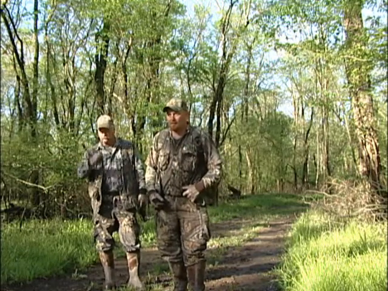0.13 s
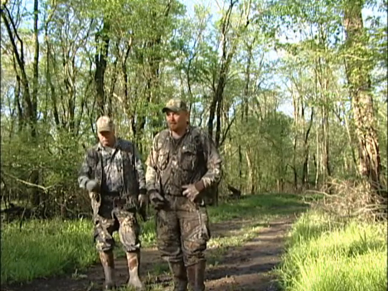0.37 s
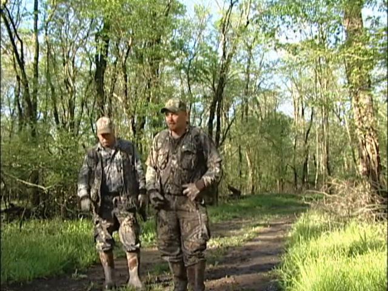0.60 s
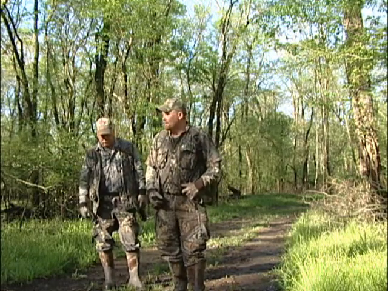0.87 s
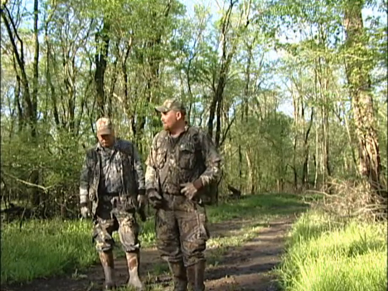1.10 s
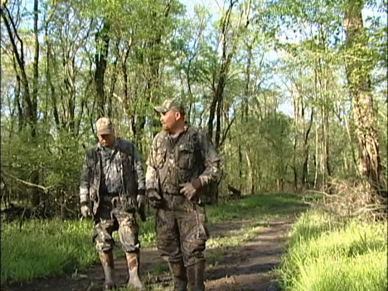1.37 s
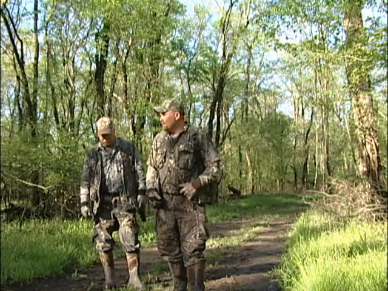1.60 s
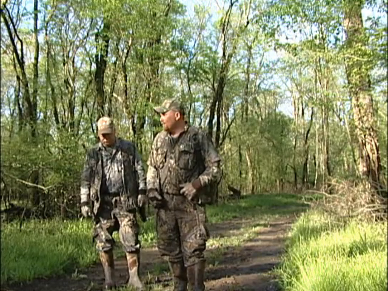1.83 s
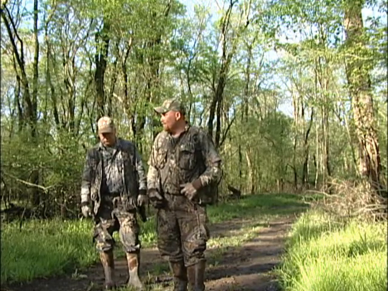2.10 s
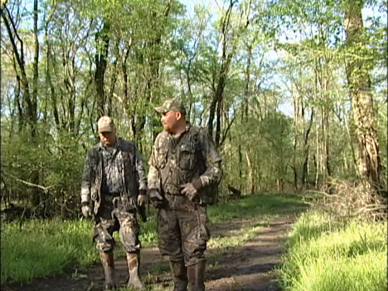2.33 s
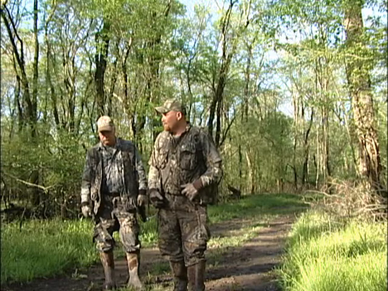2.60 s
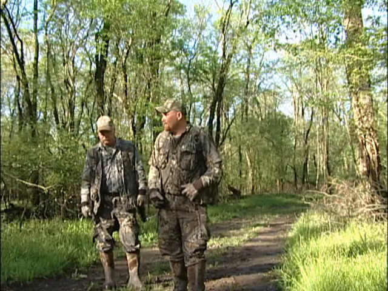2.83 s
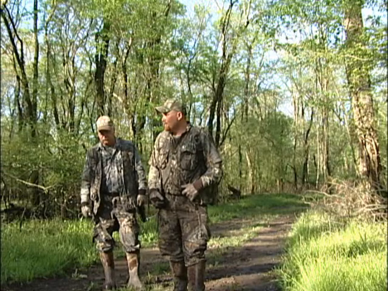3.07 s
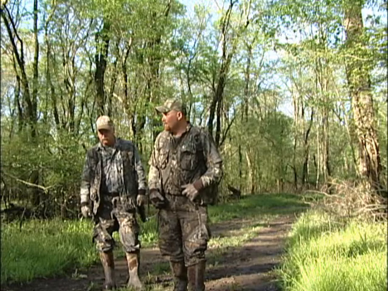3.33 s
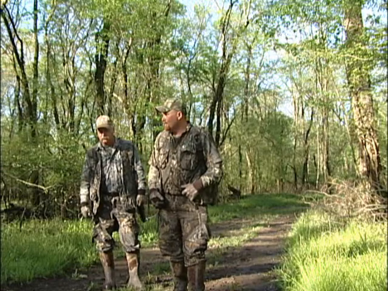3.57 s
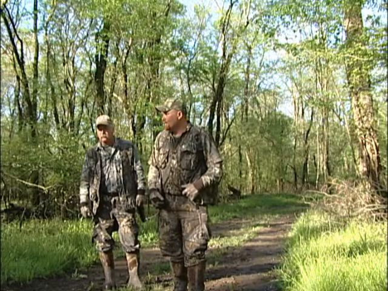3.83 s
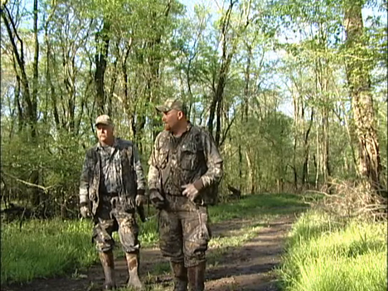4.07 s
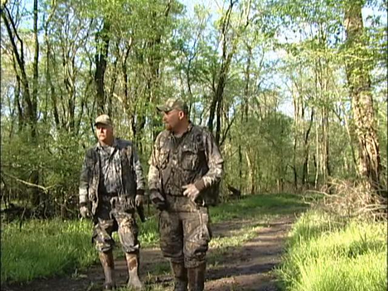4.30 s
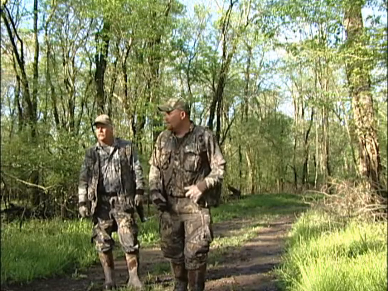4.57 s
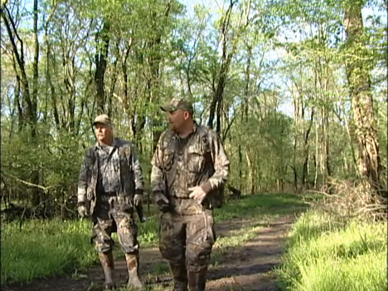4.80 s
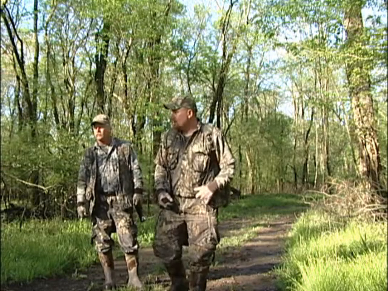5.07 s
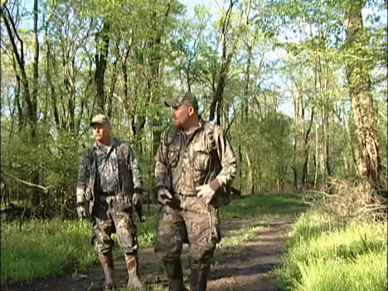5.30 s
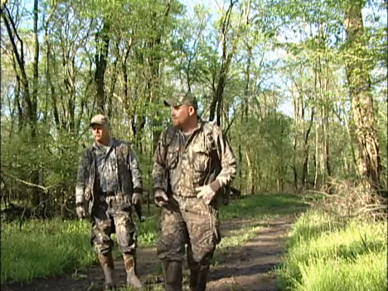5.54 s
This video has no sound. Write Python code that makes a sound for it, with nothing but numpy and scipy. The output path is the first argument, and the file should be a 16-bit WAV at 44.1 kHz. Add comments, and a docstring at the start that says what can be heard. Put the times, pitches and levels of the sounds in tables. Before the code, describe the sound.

In a leafy wood, the faint last echo of a blown call fades under small buzzy bird notes and rising whistles. A clear whistle passes early, then a rolling song repeats, ringing off trunks. Wind thumps low on the open microphone over rumble and a far drone. Near the end, two walkers rustle cloth and leaves and snap twigs close by.

```python
"""Songbirds ring among the trunks of a spring wood: trembling sines, pulse overtones and gritty noise bursts.
The last echo of a blown crow call dies as one fading noise band. Two walkers rustle cloth and leaves (dense
grains), scuff (noise bursts) and snap twigs (ringing ticks). Wind thumps on the microphone (rounded slow
swings) over a rumble and a far drone; the level of both rises slowly."""
import sys
import numpy as np
from scipy import signal
from scipy.fft import rfft, irfft
from scipy.io import wavfile
from scipy.ndimage import uniform_filter1d

SR = 44100
rng = np.random.default_rng(int(sys.argv[2]) if len(sys.argv) > 2 else 0)


def ratio(d):
    """dB to gain"""
    e = np.asarray(d, float) / 20
    return 10 ** e


def output_pcm(signal):
    """Save a mono or channel-first signal as 16-bit PCM at the path in sys.argv[1].

    Samples are clipped to [-1, 1] before scaling.
    """
    pcm = np.clip(np.atleast_2d(signal).T, -1, 1) * 32767
    wavfile.write(sys.argv[1], SR, np.round(pcm).astype(np.int16))


N = 250047
T = np.arange(N) / SR

# bird levels are dry: ahead of trunks and dips
# rolling song, two notes a phrase: start_s, first_length_s, pitch_hz, first_start_db, second_db
PHRASES = [(2.377, 0.13, 2630, -57, -64), (2.52, .09, 2640, -64, -72), (2.744, 0.045, 2704, -60, -57),
           (2.876, 0.054, 2660, -53.5, -70), (3.102, 0.058, 2672, -46.5, -62),
           (3.331, 0.063, 2670, -48, -57), (3.553, 0.072, 2656, -45, -63), (3.794, 0.061, 2656, -45.5, -60),
           (4.009, .09, 2715, -53, -60), (4.199, 0.061, 2645, -50, -52), (4.425, .135, 2643, -45.5, -70),
           (4.573, 0.047, 2657, -54, -72), (4.65, 0.086, 2645, -44, -50), (4.791, .05, 2635, -50.5, -72),
           (4.863, 0.083, 2630, -51, -70), (4.99, 0.099, 2615, -50, -53.5)]
NOTE_S, SECOND_AFTER_S, NOTE_FADE_DB_PER_S = 0.052, 0.1035, 47  # the fade is the first note's
NOTE_DROP_HZ, NOTE_DROP_S = 49.97, 0.0084  # each phrase drops onto its pitch
# lower notes answering the rolling song: start_s, level_db
LOW_NOTES = [(3.2, -69), (3.43, -68), (3.65, -69), (3.89, -71), (4.1, -69), (4.295, -60), (4.52, -61),
             (4.755, -56.5)]
LOW_NOTE_HZ = 2156
# rising whistle, one shape for all: start_s, level_db, top_hz
RISERS = [(0.41, -60, 2688), (0.865, -58, 2670), (1.32, -57.5, 2666), (1.75, -73, 2650),
          (2.19, -65.5, 2637), (5.28, -52.5, 2650)]
RISER_S, RISER_CLIMB_HZ, RISER_SWELL_S = 0.2, 216, 0.063
# near whistle, a list of notes, each a track of: time_s, pitch_hz, level_db
NEAR_WHISTLE = [
    [(1.07, 4420, -64), (1.084, 4660, -55.5), (1.114, 4656, -46.5), (1.138, 4754, -48.5),
     (1.185, 4790, -48.5), (1.198, 4750, -45), (1.24, 4684, -51), (1.25, 4826, -48), (1.28, 4580, -52),
     (1.305, 4610, -59), (1.326, 4450, -49), (1.346, 4360, -55), (1.358, 4350, -56), (1.374, 4100, -58),
     (1.387, 4120, -62)],
]
# pitch tremble, rms share of the pitch
SONG_TREMBLE, NEAR_TREMBLE, RISER_TREMBLE = 0.002, 0.003, 0.001
# thin notes: start_s, length_s, start_hz, end_hz, level_db
THIN_NOTES = [(0.102, 0.047, 8500, 6000, -68), (.01, .11, 2510, 2650, -70), (.135, 0.093, 2670, 2720, -67),
              (0.289, 0.044, 2186, 2314, -65.5), (.745, 0.04, 2200, 2250, -65),
              (0.546, 0.197, 6650, 6550, -74), (0.768, 0.15, 6220, 6060, -67),
              (0.835, 0.11, 6180, 6330, -59.5), (.909, 0.11, 6900, 7200, -68),
              (0.963, 0.077, 7640, 7660, -73), (1.298, .12, 7750, 7620, -76),
              (1.689, .155, 6600, 6930, -69.5), (2.11, 0.29, 6680, 6580, -74),
              (2.095, .06, 7680, 7600, -76), (2.37, .05, 7850, 7900, -72), (2.451, 0.066, 6240, 6100, -54),
              (2.46, 0.18, 2250, 2377, -63.5), (2.526, 0.05, 6580, 6540, -57),
              (2.63, .03, 6600, 6580, -57.5), (2.648, 0.055, 2740, 3050, -52),
              (2.582, .025, 3900, 3850, -56), (2.782, 0.11, 6150, 6150, -57.5),
              (2.877, 0.05, 6620, 6780, -58.5), (2.888, .02, 4300, 4150, -62),
              (2.92, 0.027, 3880, 3850, -63), (2.694, 0.061, 6550, 6670, -64),
              (3.065, 0.11, 7050, 7600, -71), (3.161, .11, 7620, 7100, -75), (3.59, 0.17, 7270, 7120, -69),
              (3.6, 0.14, 7600, 7720, -71), (3.8, .12, 7050, 7300, -79), (3.714, 0.053, 6350, 6550, -62),
              (4.11, .07, 6900, 7420, -72), (4.192, 0.135, 7400, 6550, -70),
              (5.228, 0.034, 8180, 7600, -59)]
THIN_ROUGH_PER_KHZ, THIN_BOW = 0.00153, 0.2  # rms share of pitch per kHz; arch of the glide
# buzzy calls: start_s, length_s, top_pulse_rate_hz, level_db (ahead of overtone gains)
BUZZES = [(0.219, 0.044, 454, -71), (0.3, 0.088, 469, -72.5), (0.419, 0.088, 472, -71.5),
          (0.539, 0.092, 482, -70), (0.672, 0.083, 490, -69.5), (0.815, 0.085, 485, -71)]
# overtones of the buzz pulses: multiple, gain_db
BUZZ_OVERTONES = [(7, -9), (8, 1), (9, 4), (10, -1)]
# shares of the pulse rate: climb at the start, fall at the end, rms roughness
BUZZ_SCOOP, BUZZ_SCOOP_S, BUZZ_DROOP, BUZZ_ROUGH = 0.12, 0.02, 0.03, 0.0119
# harsh rising call: time_s, pulse_rate_hz, throat_hz, level_db (of an overtone at the throat pitch)
HARSH = [(3.79, 275.3, 3370, -58), (3.812, 281.8, 3220, -49), (3.845, 295, 3350, -49),
         (3.87, 295, 3430, -48.5), (3.91, 307, 3530, -50.5), (3.928, 302, 3530, -54),
         (3.94, 294, 3560, -58)]
HARSH_THROAT_WIDTH_HZ, HARSH_ROUGH = 330, 0.010625  # rms share of the rate
PATCHY_DB = 2.5  # rms; each overtone comes and goes on its own
# noisy bird bursts: start_s, length_s, centre_hz, width_hz, level_db
CHATTER = [(.13, 0.059, 6600, 2500, -67.5), (2.525, 0.096, 5600, 2500, -57.5),
           (2.555, 0.077, 4350, 1900, -57), (2.4, 0.3, 4830, 200, -65), (2.67, 0.21, 4750, 130, -68),
           (3.56, 0.063, 7500, 600, -66), (3.39, .09, 6800, 700, -72), (4.1, .05, 5500, 350, -66),
           (4.16, .14, 5380, 560, -70), (2.86, 0.091, 6500, 1400, -57.5), (2.91, 0.048, 4100, 1600, -55.5),
           (3.365, 0.038, 6900, 800, -62), (3.585, 0.02, 4100, 400, -56.5), (3.6, 0.18, 3040, 1500, -58.5),
           (3.82, 0.14, 3170, 700, -53)]
TRUNK_T60_S, TRUNK_ECHO_DB, TRUNK_FLUTTER_DB = 1.3, -5.5, 1.3
# blurred lower phrases of the rolling song: time_s, level_db (ahead of the fade-in)
SONG_HAZE = [(1.4, -83), (2.2, -84), (2.5, -63.5), (3.2, -54.5), (3.65, -54), (4.2, -52), (4.7, -49.5),
             (5.1, -54.5), (5.5, -56), (5.67, -68)]
# bands of the haze: centre_hz, width_hz, relative_db
HAZE_BANDS = [(2150, 98, -2), (2360, 180, 5.5), (2500, 130, 4.5), (2650, 63, 8.5), (3580, 120, -8.5),
              (4170, 40, -13.5)]
# last echo of the blown call: centre_hz, width_hz, start_db, t60_s
CALL_ECHO = (1529, 261, -61.5, 5)
# twig snaps: start_s, peak_db, ring_hz
SNAPS = [(0.5064, -52, 5060), (0.627, -54, 8000), (0.6504, -50, 7400), (0.783, -47, 7000),
         (0.9454, -43, 6660), (1.9878, -44, 5000), (3.505, -48, 5030), (3.75, -42, 5440),
         (4.212, -44, 7500), (4.642, -38, 3600), (4.698, -43, 10500), (4.718, -42, 3800),
         (4.762, -42, 4000), (4.871, -43, 11000), (4.89, -24.5, 6100), (4.895, -37, 7000),
         (4.9415, -43, 8200), (4.9487, -38, 7270), (4.994, -33, 6000), (4.9987, -31.5, 6800),
         (5.018, -39, 7390), (5.038, -32, 10400), (5.5313, -25.5, 10200), (5.5858, -26, 8900),
         (5.6157, -40, 6500), (5.6356, -32, 6000)]
SNAP_T60_S, SNAP_WIDTH_HZ = 0.0082, 2600
SNAP_TICK_DB = -4  # dry tick, ahead of scaling to peak_db
# cloth scuffs: start_s, length_s, centre_hz, width_hz, level_db
SCUFFS = [(4.664, 0.045, 2780, 1200, -46), (4.7, 0.03, 3060, 1300, -43), (4.757, 0.024, 3600, 2000, -51),
          (5.21, 0.04, 1780, 714, -50.5), (5.37, 0.029, 5900, 500, -51), (5.4, 0.075, 4830, 2500, -52),
          (5.56, 0.095, 4370, 900, -54)]
# cloth and leaves: time_s, level_db (ahead of fade-in and dips)
RUSTLE = [(4.5, -67), (4.7, -53), (4.85, -55.5), (5.0, -51.5), (5.15, -51), (5.4, -48.5), (5.5, -55),
          (5.67, -51)]
# spectrum of cloth and leaves: freq_hz, relative_db_per_hz
RUSTLE_COLOUR = [(590, -12), (1000, -12), (1940, -11.5), (2590, -12), (3150, -15), (5920, -15),
                 (14100, -27.5), (15500, -33)]
# lone dry leaves breaking; dB of the bare clicks
CRACKLES_PER_S, CRACKLE_DB, CRACKLE_SPREAD_DB = 150, 18, 3.5
CRACKLE_HZ, CRACKLE_WIDTH_HZ = 7000, 6500
# wind on the microphone: time_s, level_db (ahead of evening and rounding)
WIND = [(0, -58), (.45, -54), (.6, -40), (2.35, -34), (2.55, -21), (2.8, -27), (4.9, -24), (5.15, -31),
        (5.67, -22)]
# spectrum of the wind: freq_hz, relative_db_per_hz
WIND_COLOUR = [(1.5, -30), (3.5, 0), (11, 0), (20, -8), (35, -22), (70, -45), (300, -130)]
WIND_TOP = 0.17  # full-scale share where the membrane's swing levels off
# spectrum of the rumble: freq_hz, relative_db_per_hz
RUMBLE_COLOUR = [(20, -57), (35, -1), (60, 8.5), (110, 0.5), (145, -14.5), (200, -86), (500, -120)]
RUMBLE_DB, RUMBLE_GUST_DB = 5.5, 3  # over the WOODS level; rms of its own gusts
LULL_DB, LULL_S = -5, 0.5  # the rumble starts in a lull
# far drone: time_s, level_db (of its band round 736 Hz, ahead of dips)
WOODS = [(0, -60.5), (.6, -57.5), (1.5, -54.5), (2.5, -53), (4.7, -52.5), (4.95, -53.5), (5.67, -50)]
# spectrum of the drone: freq_hz, relative_db_per_hz
WOODS_COLOUR = [(53, -9), (90, -2.5), (141, -7), (314, -15), (682, -16.5), (1840, -25.5), (2380, -28.5),
                (2590, -24.5), (2830, -30.5), (4350, -34.5), (5510, -37), (6690, -37.5), (14500, -46.5),
                (15500, -47)]
# steady tones: pitch_hz, level_db (over the WOODS level)
HUMS = [(150.7, -2.5), (11838, -30.5)]
NOTCH_HZ, NOTCH_WIDTH_HZ = 163, 16
# brief level dips: centre_s, depth_db, half_length_s
DIPS = [(2.628, 2.5, 0.092), (4.38, 6, 0.045), (4.722, 4, 0.05)]
# faint twins of the treble, first five multiples of the ripple: twin_db
RIPPLE_DB = [-23, -31, -35, -37, -38]
RIPPLE_HZ = 15625 / 4


def curve(rows):
    """Columns of a table joined by straight lines in time."""
    s, *columns = np.transpose(rows)
    return [np.interp(T, s, c) for c in columns]


def unit(x):
    """Scale to rms 1."""
    return x / np.sqrt(np.mean(x ** 2))


def coloured(x, colour):
    """Shape a spectrum by points on a log frequency axis; rms 1."""
    hz, db = np.transpose(colour)
    f = np.maximum(np.arange(N // 2 + 1) * SR / N, 0.1)
    gain = ratio(np.interp(np.log(f), np.log(hz), db))
    return unit(irfft(rfft(x) * gain, N))


def band(x, hz, width_hz):
    """One resonance."""
    return signal.lfilter(*signal.iirpeak(hz, hz / width_hz, fs=SR), x)


def narrow_noise(noise, hz, width_hz):
    """Noise through the same resonance twice; rms 1."""
    return unit(band(band(noise, hz, width_hz), hz, width_hz))


def walk(rate_hz):
    """Random levels held 1 / rate_hz and slewed twice; rms 1."""
    k = int(SR / rate_hz)
    held = rng.standard_normal(N // 20)[np.arange(N) // k]
    return unit(uniform_filter1d(uniform_filter1d(held, k), k))


def gate(start_s, end_s, edge_s=0.0057):
    """1 between two times, with soft edges."""
    return np.clip(np.minimum(T - start_s, end_s - T) / edge_s, 0, 1)


def tone(hz):
    """Sine of rms 1 on a moving pitch."""
    return np.sqrt(2) * np.sin(2 * np.pi * np.cumsum(hz) / SR)


def glide(s, length, start_hz, end_hz, bow):
    """Arched pitch: a rise levels off, a fall steepens."""
    u = np.clip((T - s) / length, 0, 1)
    arch = 4 * bow * np.sign(end_hz - start_hz) * u * (1 - u)
    return start_hz + (end_hz - start_hz) * (u + arch)


def rolling_song(tremble):
    """Near-sine phrases: a fading note and a second one on the same settling pitch."""
    out = 0
    for s, length, hz, first_db, second_db in PHRASES:
        fade_db = NOTE_FADE_DB_PER_S * (T - s).clip(0, length)
        first = gate(s, s + length, 0.012) * ratio(first_db - fade_db)
        second_s = s + SECOND_AFTER_S
        second = gate(second_s, second_s + NOTE_S, 0.012) * ratio(second_db)
        drop_hz = NOTE_DROP_HZ * np.exp(-np.clip(T - s, 0, 1) / NOTE_DROP_S)
        out = out + (first + second) * tone((hz + drop_hz) * (1 + SONG_TREMBLE * tremble))
    return out


def low_notes(tremble):
    """Short near-sine answers on one lower pitch."""
    note = tone(LOW_NOTE_HZ * (1 + SONG_TREMBLE * tremble))
    return sum(gate(s, s + NOTE_S, 0.015) * ratio(db) * note for s, db in LOW_NOTES)


def risers(tremble):
    """Swelling near-sines whose climb slows toward the top pitch."""
    out = 0
    for s, db, top_hz in RISERS:
        left = 1 - np.clip((T - s) / RISER_S, 0, 1)
        hz = top_hz - RISER_CLIMB_HZ * left ** 1.4
        swell = gate(s, s + RISER_S, 0.01) * gate(s, 6, RISER_SWELL_S)
        out = out + swell * ratio(db) * tone(hz * (1 + RISER_TREMBLE * tremble))
    return out


def near_whistle(tremble):
    """Near-sine on a traced pitch and level."""
    out = 0
    for note in NEAR_WHISTLE:
        hz, db = curve(note)
        out = out + gate(note[0][0], note[-1][0]) * ratio(db) * tone(hz * (1 + NEAR_TREMBLE * tremble))
    return out


def thin_notes(shake):
    """Arched sine glides; higher notes have rougher pitch."""
    out = 0
    for s, length, start_hz, end_hz, db in THIN_NOTES:
        hz = glide(s, length, start_hz, end_hz, THIN_BOW)
        rough = 1 + THIN_ROUGH_PER_KHZ * end_hz / 1000 * shake
        out = out + ratio(db) * gate(s, s + length, length / 4) * tone(hz * rough)
    return out


def buzzes(shake):
    """A few patchy overtones of a bent pulse rate."""
    out = 0
    for s, length, top_hz, db in BUZZES:
        t = np.clip(T - s, 0, length)
        bend = 1 - BUZZ_SCOOP * np.exp(-t / BUZZ_SCOOP_S) - BUZZ_DROOP * (t / length) ** 4
        hz = top_hz * bend * (1 + BUZZ_ROUGH * shake)
        overtones = sum(ratio(d + PATCHY_DB * walk(50)) * tone(k * hz) for k, d in BUZZ_OVERTONES)
        out = out + ratio(db) * gate(s, s + length, length / 5) * overtones
    return out


def harsh_call(shake):
    """Pulse overtones weighted by a moving throat resonance."""
    out = 0
    hz, throat_hz, db = curve(HARSH)
    for k in range(9, 15):
        throat = 1 / (1 + ((k * hz - throat_hz) / HARSH_THROAT_WIDTH_HZ) ** 2) ** 2
        out = out + throat * ratio(PATCHY_DB * walk(70)) * tone(k * hz * (1 + HARSH_ROUGH * shake))
    return gate(HARSH[0][0], HARSH[-1][0]) * ratio(db) * out


def bursts(rows):
    """Gritty noise in single bands with soft edges."""
    noise = rng.standard_normal(N) * ratio(3 * walk(400))
    return sum(ratio(db) * gate(s, s + length, length / 3) * narrow_noise(noise, hz, width_hz)
               for s, length, hz, width_hz, db in rows)


def chatter():
    """Trills of small birds as gritty noise bursts."""
    return bursts(CHATTER)


def trunks(x):
    """Direct sound fluttering in the moving air, plus scattered echoes off the trunks."""
    t = T[:2 * SR]
    tail = rng.standard_normal(len(t)) * ratio(-60 * t / TRUNK_T60_S) * np.clip(t / 0.031, 0, 1)
    tail = tail * ratio(TRUNK_ECHO_DB) / np.sqrt(np.sum(tail ** 2))
    return x * ratio(TRUNK_FLUTTER_DB * walk(60)) + signal.fftconvolve(x, tail)[:N]


def haze():
    """Overlapping far notes as narrow noise bands that swell and fade on their own."""
    noise = rng.standard_normal(N)
    bands = sum(ratio(db + 2 * walk(9.9)) * narrow_noise(noise, hz, width_hz)
                for hz, width_hz, db in HAZE_BANDS)
    return ratio(curve(SONG_HAZE)[0]) * gate(SONG_HAZE[0][0], 5.7, 0.54) * unit(bands)


def birds():
    """All birds; the sines share one tremble, the rough calls one shake."""
    tremble, shake = walk(300), walk(500)
    whistled = rolling_song(tremble) + low_notes(tremble) + risers(tremble) + near_whistle(tremble)
    rough = thin_notes(shake) + buzzes(shake) + harsh_call(shake)
    return trunks(whistled + rough + chatter()) + haze()


def call_echo():
    """The strongest band of the call, fading among the trees."""
    hz, width_hz, db, t60_s = CALL_ECHO
    return narrow_noise(rng.standard_normal(N), hz, width_hz) * ratio(db - 60 * T / t60_s)


def snaps():
    """Twigs: a sharp tick and a noise burst ringing briefly round its own pitch."""
    out, t = np.zeros(N + SR), T[:SR // 25]
    for s, db, hz in SNAPS:
        burst = rng.standard_normal(len(t)) * ratio(-60 * t / SNAP_T60_S)
        burst[0] += 12  # tick that strikes the ring
        burst = band(band(burst, hz, 2 * SNAP_WIDTH_HZ), hz, SNAP_WIDTH_HZ)
        burst[0] += ratio(SNAP_TICK_DB)
        i = int(s * SR)
        out[i:i + len(t)] += ratio(db) * burst / np.max(np.abs(burst))
    return out[:N]


def scuffs():
    """Cloth scuffing close by as gritty noise bursts."""
    return bursts(SCUFFS)


def rustle():
    """Dense clumped grains of cloth and dry leaves, with lone crackles on top."""
    grains = rng.standard_normal(N) * ratio(1.6 * walk(1100) + 1.3 * walk(49))
    struck = rng.random(N) < CRACKLES_PER_S / SR
    clicks = struck * ratio(CRACKLE_DB + CRACKLE_SPREAD_DB * rng.standard_normal(N))
    grains = grains + band(clicks, CRACKLE_HZ, CRACKLE_WIDTH_HZ)
    level = ratio(curve(RUSTLE)[0]) * gate(RUSTLE[0][0], 6, 0.15)
    return level * coloured(grains, RUSTLE_COLOUR)


def wind():
    """Slow pressure swings on the membrane, rounded at the top."""
    swing = coloured(rng.standard_normal(N), WIND_COLOUR)
    # steady breeze: swings of fairly even size
    swing = swing / np.sqrt(uniform_filter1d(swing ** 2, size=SR // 2) + 0.1)
    return WIND_TOP * np.tanh(ratio(curve(WIND)[0]) * swing / WIND_TOP)


def rumble():
    """Low noise that shares the drone's creep and adds its own gusts."""
    lull_db = LULL_DB * np.clip(1 - (T / LULL_S) ** 4, 0, 1)
    level_db = RUMBLE_DB + curve(WOODS)[0] + RUMBLE_GUST_DB * walk(4.585) + lull_db
    return ratio(level_db) * coloured(rng.standard_normal(N), RUMBLE_COLOUR)


def woods():
    """Far drone of notched noise with faint steady tones, all under one level."""
    bed = coloured(rng.standard_normal(N), WOODS_COLOUR)
    bed = bed - band(bed, NOTCH_HZ, NOTCH_WIDTH_HZ)
    bed = bed / np.sqrt(np.mean(band(bed, 736, 1214) ** 2))
    hums = sum(ratio(db) * tone(np.full(N, hz)) for hz, db in HUMS)
    return ratio(curve(WOODS)[0]) * (bed + hums)


def scene():
    """Everything at one microphone; birds, rustle and drone dip briefly in level."""
    dips = ratio(-sum(db * gate(s - half, s + half, half) for s, db, half in DIPS))
    dipped = dips * (birds() + rustle() + woods())
    return (dipped + call_echo() + snaps() + scuffs() + wind() + rumble())[None]


def band_limit(x):
    """A steep low-pass at the top of the band."""
    return signal.sosfilt(signal.butter(12, 15910, fs=SR, output="sos"), x)


def record(dry):
    """A fast ripple of the gain gives notes of about 2 to 7.5 kHz faint twins at even steps."""
    ripple = sum(np.sqrt(2) * ratio(db) * tone(np.full(N, (k + 1) * RIPPLE_HZ))
                 for k, db in enumerate(RIPPLE_DB))
    treble = signal.sosfilt(signal.butter(4, 2000, "high", fs=SR, output="sos"), dry)
    treble = signal.sosfilt(signal.butter(6, 7500, fs=SR, output="sos"), treble)
    mix = dry + treble * ripple
    return band_limit(mix)


dry = scene()
out = record(dry)
output_pcm(out)
```